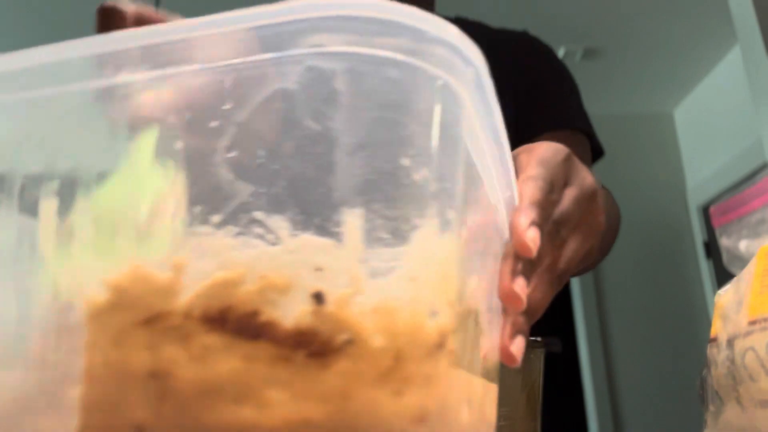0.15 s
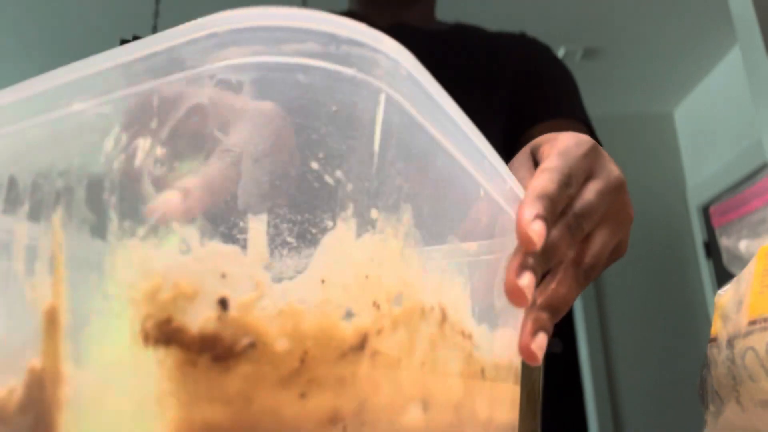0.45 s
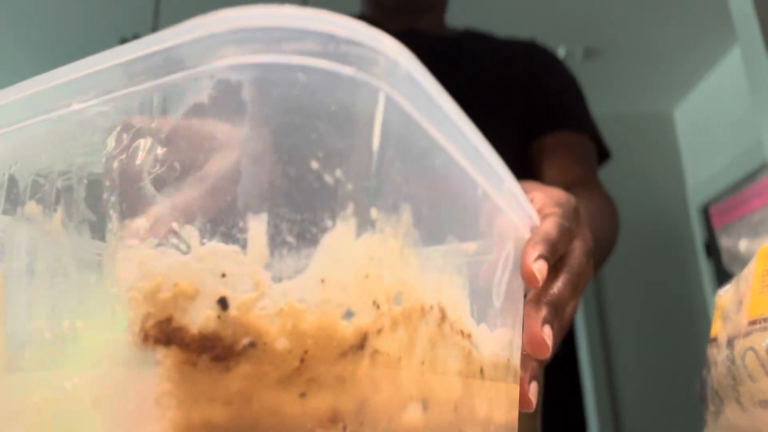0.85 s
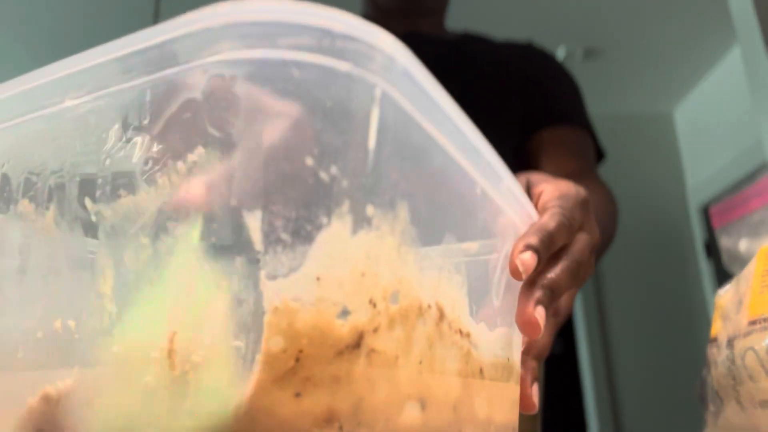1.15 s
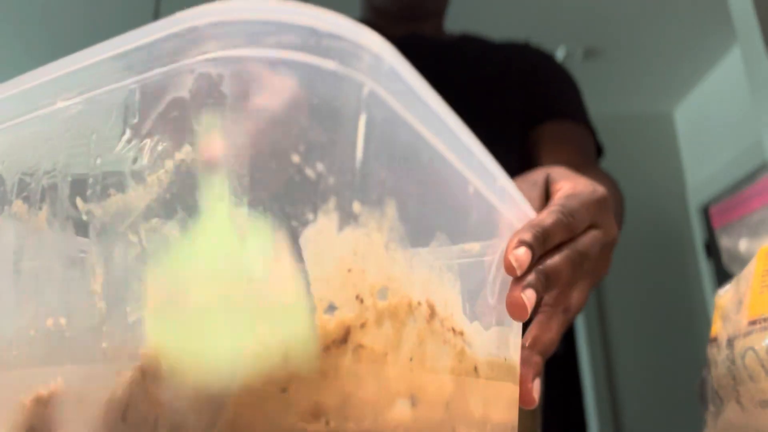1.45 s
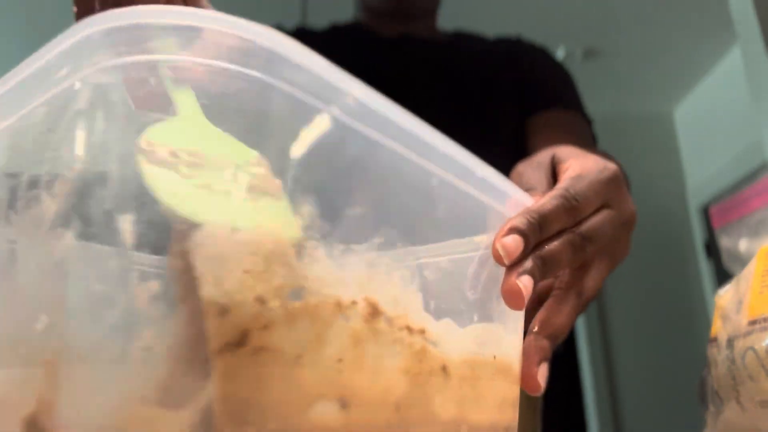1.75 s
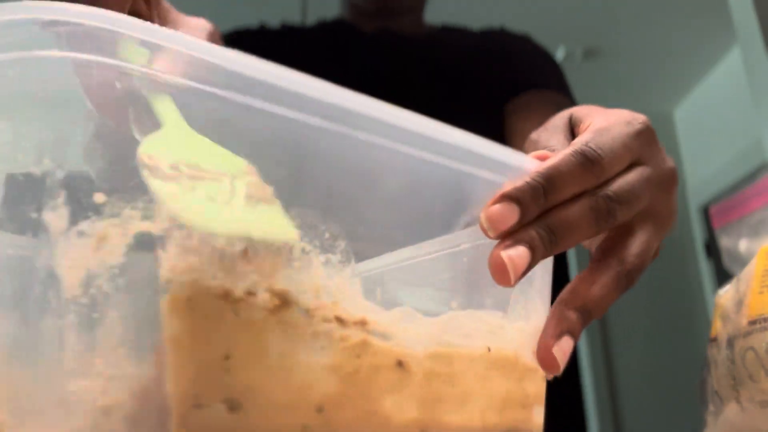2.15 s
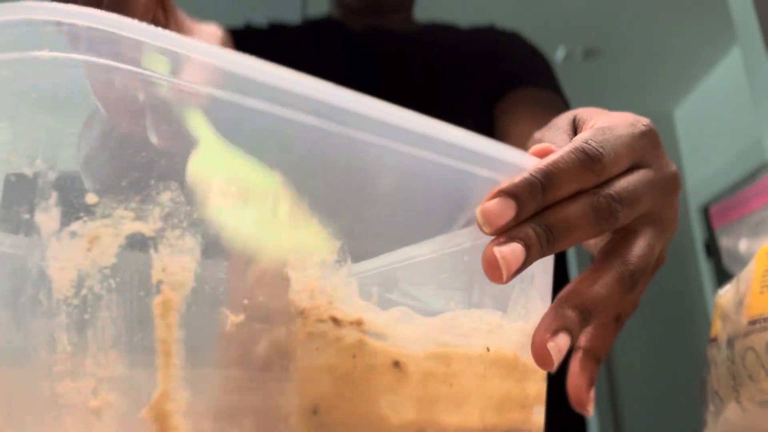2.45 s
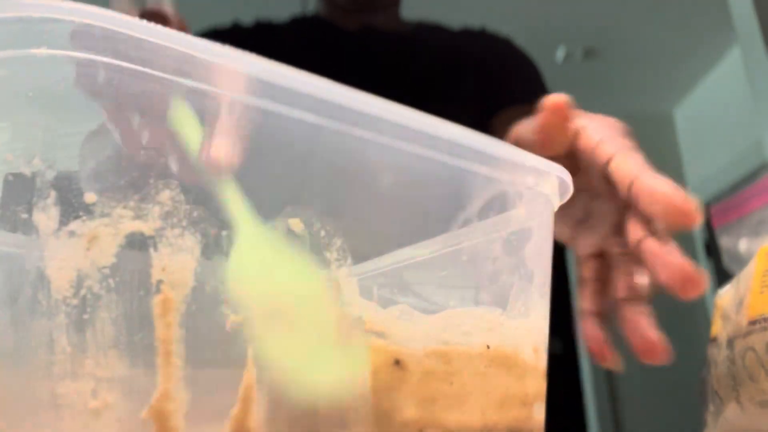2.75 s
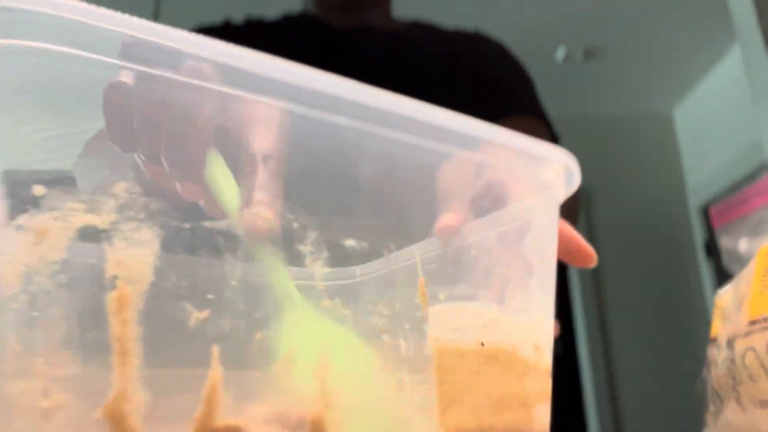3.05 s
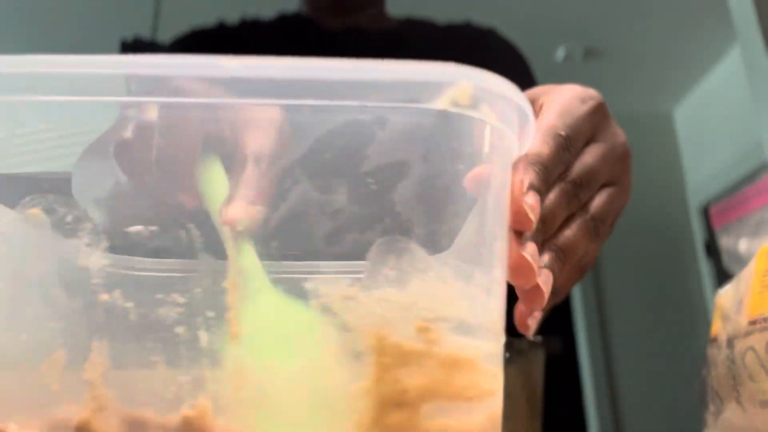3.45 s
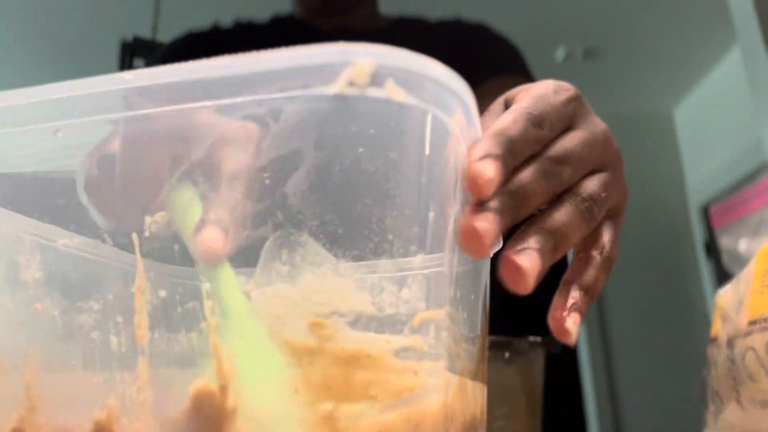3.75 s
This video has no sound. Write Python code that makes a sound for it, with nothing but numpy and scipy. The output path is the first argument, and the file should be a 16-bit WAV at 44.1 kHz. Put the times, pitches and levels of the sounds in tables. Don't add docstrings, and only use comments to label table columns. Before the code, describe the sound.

A soft spatula scrapes and knocks irregularly inside a thin plastic tub, with wet batter smacks.

```python
import sys
import numpy as np
from scipy import signal
from scipy.fft import rfft, irfft, next_fast_len
from scipy.io import wavfile
from scipy.ndimage import uniform_filter1d, map_coordinates

SR = 44100
rng = np.random.default_rng(int(sys.argv[2]) if len(sys.argv) > 2 else 0)


def gain_from_db(level_db):
    decades = np.asarray(level_db, float) / 20
    return 10 ** decades


def to_wav(sig):
    pcm = np.clip(np.atleast_2d(sig), -1, 1) * 32767
    pcm = np.round(pcm).astype(np.int16)
    wavfile.write(sys.argv[1], SR, pcm.T)


N = 171990

# frequency in Hz, bandwidth in Hz, level in dB.
TUB = [(113, 78.4, 4.5), (211.4, 85, 1.5), (285.6, 62, -9), (422.6, 41.6, -6), (516.7, 27, -4),
       (713, 65, -9), (1041.4, 54, -6.5), (1694, 138, -29), (3180, 1470, -31.5), (4630, 100, -37)]
# frequency in Hz, level in dB.
HISS = [(1000, -120), (1400, 5.5), (2100, -1.5), (3300, -1), (6500, 1.5), (9000, 0), (12000, -5),
        (15000, -4.5)]
EDGE_HZ = 1067


def unit(x):
    return x / np.sqrt(np.mean(x ** 2) + 1e-20)


def along(points, hz):
    f, value = np.transpose(points)
    return np.interp(np.log(hz + 1), np.log(f + 1), value)


def wobble(rate_hz):
    values = rng.standard_normal(int(N * rate_hz / SR) + 4)
    return map_coordinates(values, [np.arange(N) * rate_hz / SR])


def filtered(x, response):
    m = next_fast_len(x.shape[-1] + SR // 4)
    spectrum = rfft(x, m) * response(np.fft.rfftfreq(m, 1 / SR))
    return irfft(spectrum, m)[..., :x.shape[-1]]


def hump(f, hz, damping):
    return 1j * f * hz * damping / (hz * hz - f * f + 1j * f * hz * damping)


def wall(f, scatter_db=np.zeros(len(TUB))):
    modes = []
    for k, (hz, width, db) in enumerate(TUB):
        resonance = 1j * f * width / (hz * hz - f * f + 1j * f * width)
        modes.append((-1) ** k * gain_from_db(db + scatter_db[k]) * resonance)
    radiation = 1 / (1 - (f / EDGE_HZ) ** 2 + 1j * f / EDGE_HZ)
    return sum(modes[:7]) * radiation + sum(modes[7:])


def pair(colour, shape=1):
    # frequency in Hz, signed correlation.
    likeness = [(60, .78), (1100, .72), (1400, .1), (2500, 0), (2740, -.86), (2820, -.86), (3050, 0),
                (6000, -.15), (7350, -.94), (8700, -.92), (10500, .97), (12800, .93), (14300, -.95)]

    def weights(hz):
        angle = np.arccos(np.clip(along(likeness, hz), -1, 1)) / 2
        return colour(hz) * [np.cos(angle), np.sin(angle)]

    mid, side = filtered(shape * rng.standard_normal((2, N)), weights)
    return unit(np.array([mid + side, mid - side]))


def patchy(x, depth_db):
    z = signal.stft(x, nperseg=512)[2]
    field = uniform_filter1d(rng.standard_normal(z.shape[1:]), size=5, axis=0)
    field = uniform_filter1d(field, size=8, axis=1)
    return unit(signal.istft(z * gain_from_db(depth_db * unit(field)), nperseg=512)[1][:, :N])


def add(out, s, x, pan_db):
    part = out[:, round(s * SR):][:, :x.shape[-1]]
    part += (x * gain_from_db([[pan_db / 2], [-pan_db / 2]]))[:, :part.shape[1]]


def turned(x):
    # time in seconds, left over right in dB.
    turning = [
        (0, 2),
        (.9, 2.5),
        (1.9, -2),
        (2.1, -6),
        (3.3, -4),
        (3.6, 1),
    ]
    left_over_right = np.interp(np.arange(N) / SR, *np.transpose(turning))
    return x * gain_from_db(left_over_right * np.array([[.5], [-.5]]))


def scrape():
    # start in seconds, length in seconds, level at the start in dB,
    # level at the end in dB, extra level into the wall in dB.
    strokes = [(0, 0.15, -48.5, -46.5, 0), (0.148, 0.25, -47, -57, -0.5), (0.4, 0.3, -70, -67.5, 4),
               (0.664, 0.11, -60, -55, 1), (0.919, 0.12, -62, -64.5, 1), (1.048, 0.096, -49, -48.5, -1.5),
               (1.37, 0.12, -51.5, -53, 1), (1.554, 0.26, -54.5, -52.5, 1.5),
               (1.82, 0.28, -50.5, -54.5, -1), (2.002, 0.27, -57.5, -58, 1.5), (2.216, 0.091, -47, -59, -5),
               (2.447, 0.11, -72.5, -65, 0.5), (2.538, 0.12, -56.5, -53.5, 1),
               (2.774, 0.091, -56.5, -67, 0.5), (2.874, 0.14, -54, -48.5, 1.5),
               (3.034, 0.37, -52.5, -51, 0), (3.316, 0.322, -55.5, -52, 2), (3.608, 0.15, -69, -58, 3)]
    rise_s, fall_s, trail_db, trail_s = 0.02, 0.045, -13, 0.27
    rub_db, rub_tilt_hz, rub_body_db = -12.5, 500, -31.5
    t, press, lean = np.arange(N) / SR, np.zeros(N), np.zeros(N)
    for s, length, start_db, end_db, wall_db in strokes:
        u = t - s
        after = np.maximum(u - length, 0)
        rise = np.clip(u / rise_s + (s < .01), 0, 1)
        fall = np.exp(-(after / fall_s) ** 2) + gain_from_db(trail_db) * np.exp(-after / trail_s)
        stroke = rise * fall * gain_from_db(start_db + (end_db - start_db) * np.clip(u / length, 0, 1))
        press = np.maximum(press, stroke)
        lean = np.maximum(lean, stroke ** 0.69 * gain_from_db(wall_db))
    grit = gain_from_db(1.0 * wobble(24.67) + 0.87 * wobble(220) + 0.93 * wobble(1200))
    hiss = patchy(pair(lambda hz: gain_from_db(along(HISS, hz)), grit), depth_db=3.0)

    def rub_colour(hz):
        rasp = gain_from_db(rub_body_db) * np.abs(hump(hz, 1650, .7)) ** 2
        return (np.abs(wall(hz)) + rasp) * hz / (hz + rub_tilt_hz)

    rub = pair(rub_colour, gain_from_db(1.3 * wobble(40) + 2.8 * wobble(200)))
    return press * hiss + turned(gain_from_db(rub_db) * lean * rub)


def kitchen():
    # frequency in Hz, level in dB.
    rumble_points = [(18, -16), (30, -5), (205, -13.5), (426, -17), (794, -33.5), (953, -29.5),
                     (1270, -40.5), (1830, -41.5), (15000, -76.5)]
    # frequency in Hz, half width in Hz, level in dB.
    hum_lines = [(57.1, 10.5, -42), (120, 9.3, -48.5)]
    hum = sum(gain_from_db(db) * pair(lambda f: 1 / (1 + ((f - hz) / width) ** 4)) for hz, width, db in hum_lines)
    rumble = pair(lambda f: gain_from_db(along(rumble_points, f)))
    return gain_from_db(-44 + 0.29 * wobble(6.43)) * rumble + hum


def smacks():
    # start in seconds, peak level in dB, 60 dB decay time in seconds, brightness
    # in steps of 3 dB (above 0 weakens the dull part, below 0 the bright part).
    peels = [(0.0657, -28, 0.034, 10), (0.1196, -17.5, 0.023, 6), (0.181, -39, .012, -2),
             (0.371, -38, 0.019, 0.5), (0.3898, -30, 0.013, 5.5), (0.4587, -30.5, 0.019, 12),
             (0.467, -34, .01, 13), (0.4903, -38, 0.014, 4), (0.5147, -37, 0.017, 13),
             (0.548, -38.5, 0.019, 14), (.68, -47, .012, 11), (0.7731, -35.5, 0.013, 1.5),
             (0.9173, -49, 0.0097, -8), (0.9309, -18, 0.017, 3.5), (0.9952, -32.5, .015, -5),
             (1.055, -48, .015, -8), (1.075, -26.5, 0.021, 10), (1.376, -43, .03, 8),
             (1.3877, -31, .015, 7), (1.7106, -26.5, 0.054, -23), (1.8427, -34, 0.034, -10),
             (2.232, -34, 0.015, -6), (2.2398, -26, 0.032, 1.5), (2.556, -53, .012, 3),
             (2.7906, -50, 0.0088, 6), (2.865, -45, .012, -2), (2.896, -48, .012, 7),
             (2.923, -47, 0.011, 9), (3.082, -47, 0.0099, 3), (3.3097, -24, 0.044, -13),
             (3.6676, -37, 0.053, -12)]
    ring_db = 22.5
    dull, bright, t = np.zeros((2, N)), np.zeros((2, N)), np.arange(SR // 8) / SR
    for s, db, t60, tilt in peels:
        burst = gain_from_db(db - 6 - 60 * t / max(t60, .004)) * (1 - np.exp(-t / .0004))
        add(dull, s, burst * gain_from_db(min(-tilt, 0) * 3), 0)
        add(bright, s, burst * gain_from_db(min(tilt, 0) * 3), 0)
    dull_noise = pair(lambda f: gain_from_db(along(HISS, f)) / (1 + (f / 6000) ** 2))
    bright_noise = pair(lambda f: gain_from_db(along(HISS, f)) * f)
    wet = dull * dull_noise + bright * bright_noise
    blow = (dull + bright)[0] * rng.standard_normal(N)
    tick = filtered(blow, lambda f: wall(f) * (f / (f + 900)) ** 2)
    return wet + gain_from_db(ring_db) * tick


def knocks():
    # start in seconds, peak level in dB, strongest frequency in Hz,
    # travel time at 400 Hz in ms, bandwidth over centre frequency.
    landings = [(0.237, -22.5, 380, 2.28, 2.6), (0.652, -18.5, 254, 2.44, 0.82),
                (0.6521, -26.5, 775, 1.56, 0.43), (.995, -16, 480, 2.5, 2.5),
                (1.391, -25.5, 404, 1.19, 0.36), (1.403, -21.5, 470, 1.25, 1.3),
                (1.712, -15, 726, 1.74, 1.34), (1.714, -18.5, 180, 5.1, 1.4), (1.841, -32, 556, 2.9, 0.88),
                (2.008, -28, 500, 2.42, 2.7), (2.163, -18, 376, 2.3, 2.35), (2.202, -26.5, 280, 2.03, 1.5),
                (2.239, -29, 500, 1.38, 1.7), (2.805, -38, 570, 1.4, 1.1), (3.27, -23.5, 260, 3.43, 1.6),
                (3.293, -21, 544, 0.57, 0.45), (3.311, -12.5, 500, 0.68, 0.84),
                (3.314, -22, 1030, 0.83, 0.22), (3.315, -18, 296, 2.28, 1.5), (3.641, -13, 520, 1, 0.79),
                (3.665, -11, 530, 0.77, 1)]
    # start in seconds, peak level in dB,
    # strongest frequency in Hz.
    ticks = [(0.075, -36, 1080), (.121, -35, 1030), (.143, -30, 1020), (.181, -39.5, 720), (.37, -41, 1080),
             (.462, -37, 795), (0.515, -37.5, 820), (0.934, -36.5, 980), (1.076, -27.5, 537),
             (1.126, -35, 690), (1.61, -40, 750), (1.805, -36, 517), (2.119, -40.5, 700), (2.562, -43, 514),
             (2.786, -45, 537), (2.877, -46, 990), (2.924, -44, 990), (2.952, -35.5, 713),
             (2.967, -32.5, 1070), (3.097, -38.5, 547), (3.15, -38.5, 716), (3.249, -35.5, 750),
             (3.425, -52, 1020), (3.745, -32.5, 1030)]
    tap_ms, tap_width, tap_front_db = .4, 0.97, -32
    arrive_db, echo_s, echo_db = -6, 0.0098, -15
    crack_db = -55
    lead = 100
    blows = [(*row, arrive_db) for row in landings]
    blows += [(*row, tap_ms, tap_width, tap_front_db) for row in ticks]
    out, luck = np.zeros((2, N)), rng.normal(0, 1.6, (len(blows), 3, len(TUB)))
    f = np.fft.rfftfreq(8192, 1 / SR)
    for (s, db, hz, ms, width, front_db), chance in zip(blows, luck):
        bending = -4j * np.pi * ms / 1000 * (np.sqrt(400 * f) - .15 * f)
        travel = np.exp(bending - 2j * np.pi * f * lead / SR)
        delay = echo_s * gain_from_db(chance[2, 1] / 4)
        back = 1 + gain_from_db(echo_db + chance[2, 0]) * np.exp(-2j * np.pi * f * delay) / (1 + 1j * f / 800)
        soft = hump(f, hz, max(width, .2)) ** 2 / (1 + 1j * f / (2.53 * hz)) ** 2 + gain_from_db(crack_db)
        front = gain_from_db(front_db) / (1 - (f / EDGE_HZ) ** 2 + 1.2j * f / EDGE_HZ) ** 2
        sides = [wall(f, chance[0] + 1.5 * chance[1] * sign) + front for sign in (1, -1)]
        x = irfft([travel * back * soft * side for side in sides])
        add(out, s - lead / SR, gain_from_db(db) * x / np.abs(x.mean(0)).max(), 0)
    return turned(out)


def judders():
    # start in seconds, #
    # length in seconds, level in dB, strongest frequency in Hz.
    clumps = [(0.261, 0.054, -38.5, 295), (1.895, 0.058, -42, 128), (1.012, 0.085, -34.5, 295),
              (1.395, 0.016, -37.5, 1000), (2.534, 0.084, -37.5, 345), (2.638, 0.043, -57, 1040),
              (2.885, 0.049, -29.5, 269), (2.932, 0.064, -46.5, 700), (3.295, 0.019, -25, 415),
              (3.328, 0.029, -54, 1060), (1.056, .07, -49.5, 890), (3.673, 0.074, -39.5, 230)]
    slips_per_s = 1800
    out = np.zeros((2, N))
    for s, length, db, hz in clumps:
        u = np.arange(SR // 4) / SR / length
        slips = rng.standard_normal(len(u)) * (rng.random(len(u)) < slips_per_s / SR)
        slips = slips + 0.074 * rng.standard_normal((2, len(u)))
        shape = np.sin(np.pi * np.clip(u, 0, 1)) ** 0.25
        x = filtered(unit(slips) * shape, lambda f: wall(f) * hump(f, hz, 0.8) ** 2)
        add(out, s, gain_from_db(db) * x / x[:, :round(length * SR)].std(), 0)
    return turned(out)


def booms():
    # start in seconds, level in dB, pitch in Hz, length in seconds.
    bends = [(0.297, -29.5, 96.6, 0.015), (.66, -31.5, 107, .014), (0.722, -36, 105, 0.015),
             (.8, -43, 97, 0.022), (1.008, -36.5, 86, 0.029), (1.052, -28.5, 86, 0.02),
             (1.11, -39.5, 120, 0.024), (1.445, -32.5, 73.6, 0.017), (1.722, -29.5, 64.5, 0.016),
             (2.016, -37, 81, 0.013), (2.169, -29, 143.6, 0.014), (2.24, -39.5, 120, 0.011),
             (2.559, -42, 101.2, 0.057), (2.678, -37.5, 99, 0.014), (2.921, -27.5, 114.4, 0.032),
             (3.271, -35, 118, 0.026), (3.316, -29, 115, 0.014), (3.647, -26.5, 105, 0.007),
             (3.666, -30, 108.8, 0.018)]
    out, luck = np.zeros((2, N)), rng.uniform(0, 2 * np.pi, (len(bends), 2))
    t = np.arange(SR // 5) / SR
    for (s, db, hz, length), (phase, upper_phase) in zip(bends, luck):
        swing = 2 * np.pi * hz * t + phase + np.array([[.35], [-.35]])
        shape = t / length * 2.89 * np.exp(1 - t / length * 2.22)
        tone = np.sin(swing) + 0.25 * np.sin(3.5 * swing + upper_phase)
        add(out, s, gain_from_db(db + 7.0) * shape * tone, -.4)
    return out


def walls(x):
    decay_s = 0.2
    t = np.arange(SR // 3) / SR
    noise = rng.standard_normal((2, len(t))) * gain_from_db(-60 * t / decay_s)
    tail = filtered(noise, lambda f: 1 / (1 + (f / 4000) ** 2)) / np.sqrt(SR * decay_s / 14)
    delayed = np.pad(x, ((0, 0), (150, 0)))
    return signal.fftconvolve(delayed, tail, axes=1)[:, :N]


def scene():
    hits = knocks() + smacks() + judders()
    return hits + gain_from_db(-7.5) * walls(hits) + turned(booms()) + scrape() + kitchen()


def roll_off(x):
    return signal.sosfilt(signal.butter(12, 16490, fs=SR, output="sos"), x)


def record(dry):
    # frequency in Hz, left over right in dB.
    port_balance = [(900, -0.5), (1300, 2), (2300, 3.5), (4300, -4.5), (5600, -5.5), (7500, 1.5)]
    top_hz, bass_hz = 16000, 42

    def ports(f):
        balance = gain_from_db(along(port_balance, f) * np.array([[.5], [-.5]]))
        return balance / (1 + (f / top_hz) ** 30) * f ** 4 / (f ** 4 + bass_hz ** 4)

    return roll_off(filtered(dry, ports))


dry = scene()
out = record(dry)
to_wav(out)
```